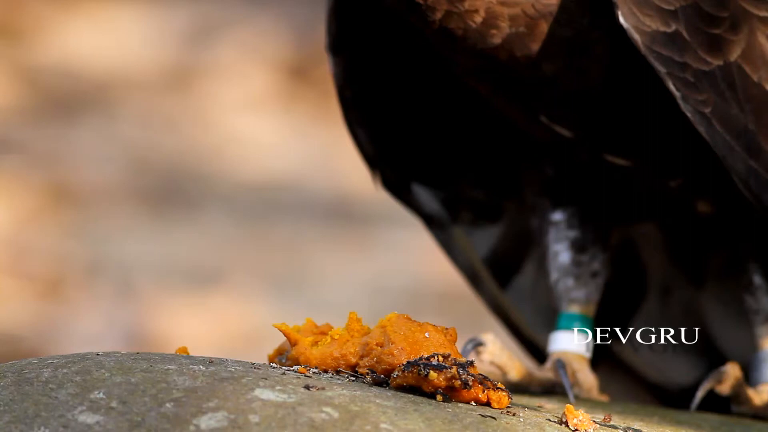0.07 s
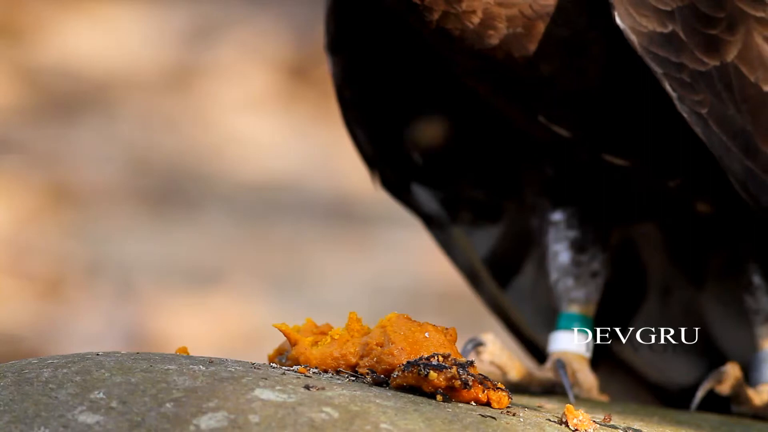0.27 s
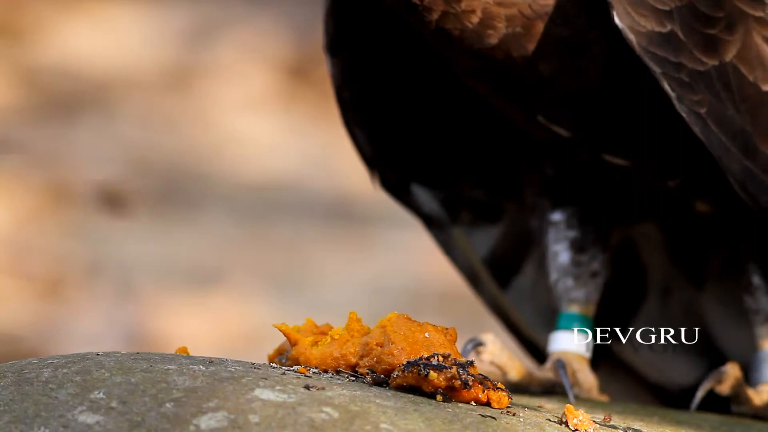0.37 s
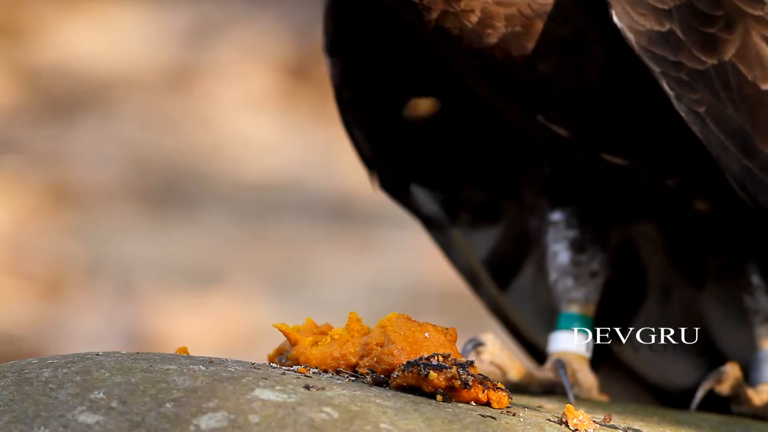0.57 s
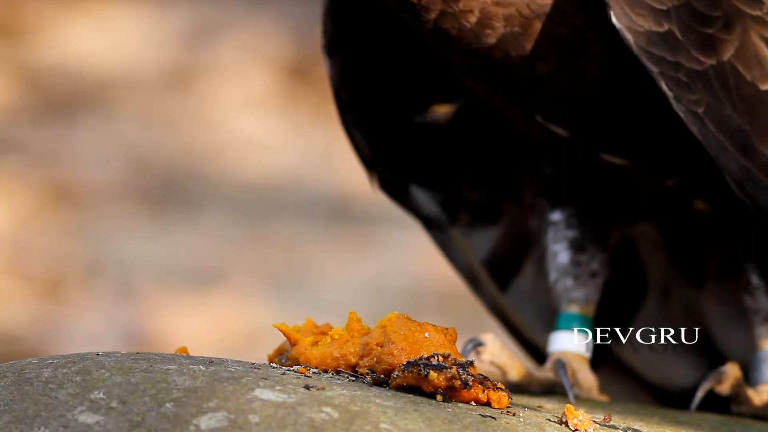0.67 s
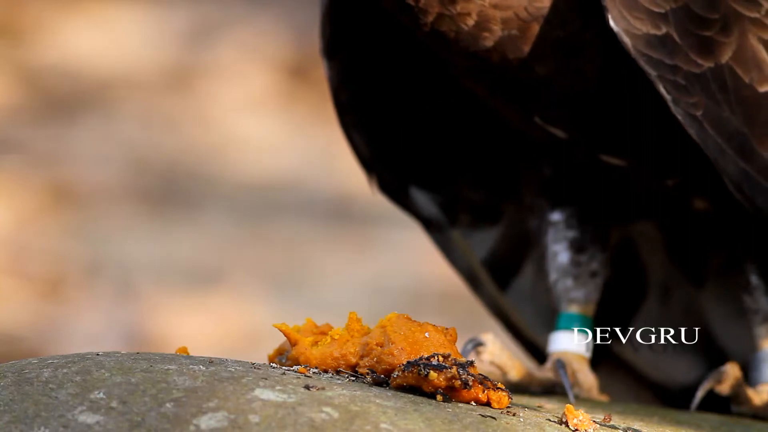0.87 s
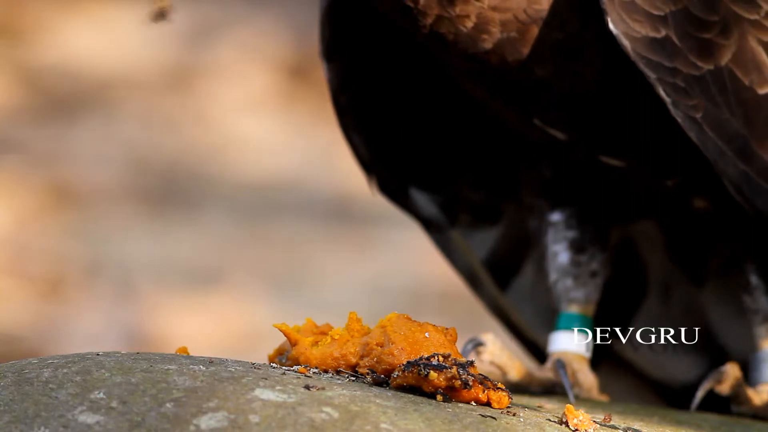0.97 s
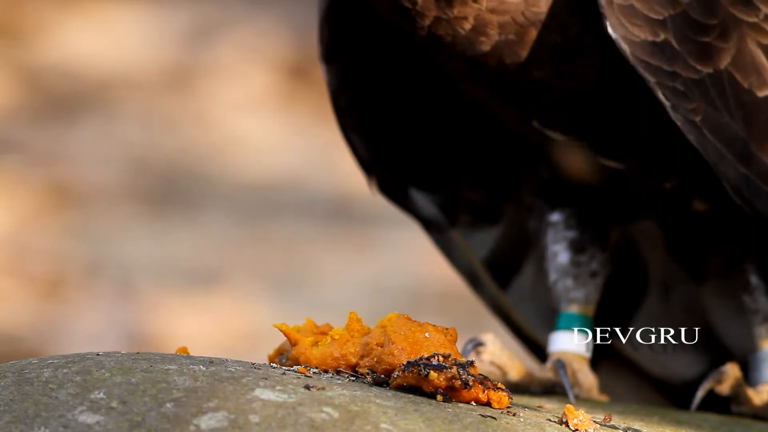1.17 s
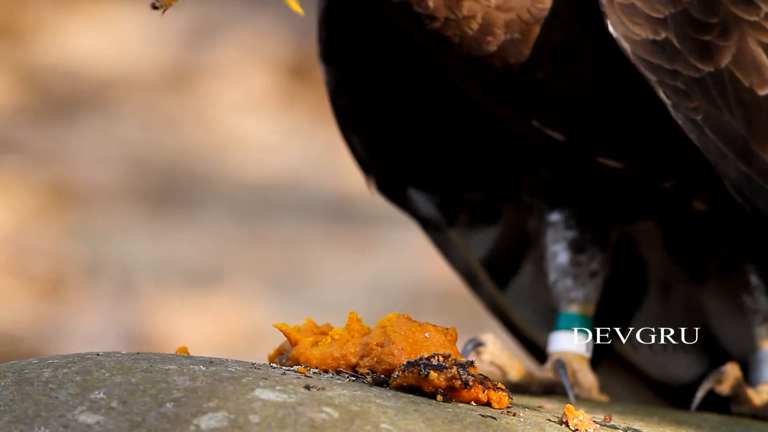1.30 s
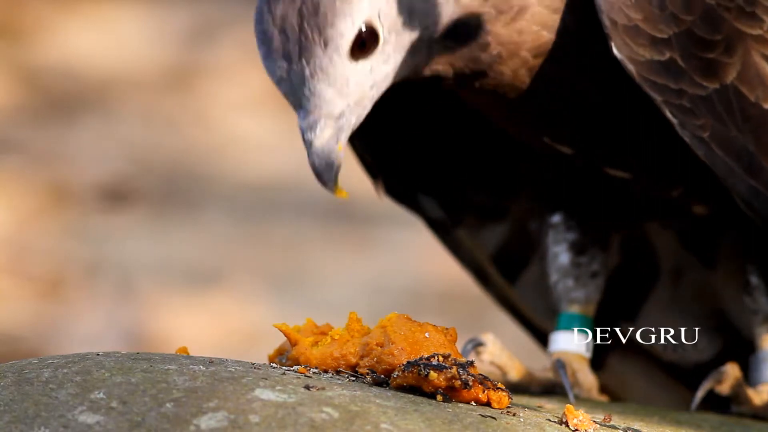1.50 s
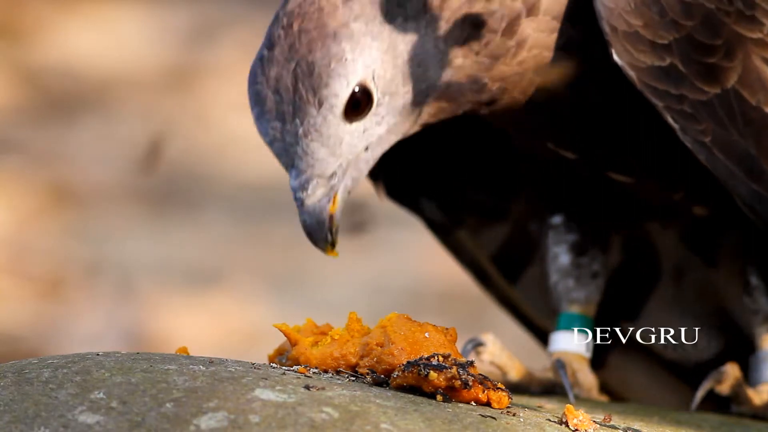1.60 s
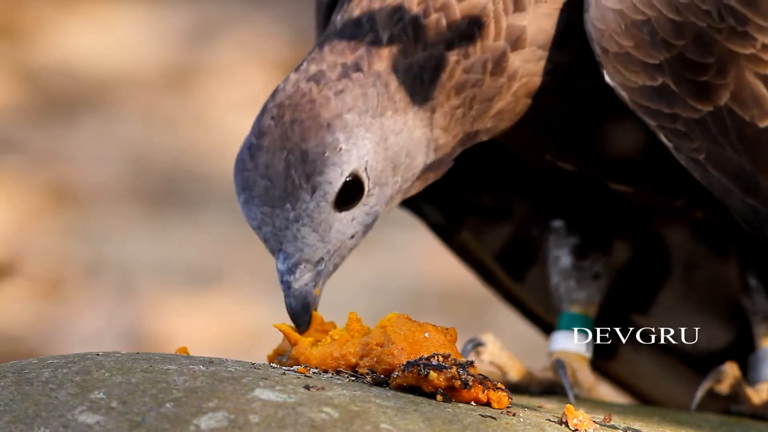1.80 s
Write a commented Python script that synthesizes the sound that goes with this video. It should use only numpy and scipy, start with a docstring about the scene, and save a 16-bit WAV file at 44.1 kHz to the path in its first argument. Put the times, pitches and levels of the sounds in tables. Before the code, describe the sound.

A bird whistles loudly from about 0.4 to 0.55 seconds, dipping, rising and turning hoarse, with three soft, woody taps during it. A farther bird gives short, mostly lower chirps around 0.1 to 0.2 seconds, at 0.7, in a quick cluster near 1.0, at 1.3 and very faintly at 1.5. The calls echo briefly among trees. Faint insect buzzing, distant rumble and steady hiss continue throughout.

```python
"""A bird's loud, scooping whistle turns hoarse among trees; a farther bird adds short, mostly lower chirps.
Each voice is a tone of the syrinx, roughened by phase modulation when its cycles come unevenly.
Reflection from trunks gives echoes, and scattering makes the wood reverberate briefly.
Soft taps, each a set of damped modes with a scuff, fall during the whistle.
Insects buzz faintly over a distant rumble and a steady hiss; the sound is mono."""
import sys
import numpy as np
from scipy import signal
from scipy.fft import rfft, irfft, next_fast_len
from scipy.io import wavfile
from scipy.ndimage import map_coordinates

SR = 44100
rng = np.random.default_rng(int(sys.argv[2]) if len(sys.argv) > 2 else 0)


def transcribe(u):
    """Save the signal u as a 16-bit wav file named by the first command-line argument.

    u: samples, shape (n,) or (channels, n), limited to [-1, 1]; the rate is SR.
    q: integer samples, one column per channel.
    """
    v = np.clip(np.atleast_2d(u).T, -1, 1)
    q = np.round(v * 32767).astype(np.int16)
    wavfile.write(sys.argv[1], SR, q)


N = 81585
T = np.arange(N) / SR


def amp(db):
    """The decibel law: amplitude grows tenfold every 20 dB."""
    return 10 ** (np.asarray(db) / 20)


def wobble(knots_per_s):
    """Spline interpolation of random knots gives a smooth fluctuation."""
    return map_coordinates(rng.standard_normal(4096), [T * knots_per_s], mode="wrap")


def filtered(x, response):
    """Linear filtering: the spectrum is multiplied by a frequency response."""
    size = next_fast_len(N + SR // 2)
    hz = np.fft.rfftfreq(size, 1 / SR)
    return irfft(rfft(x, size) * response(hz), size)[..., :N]


def noise(spectrum):
    """Spectral shaping colours white noise; the result has rms 1."""
    knot_hz, db = np.transpose(spectrum)
    white = rng.standard_normal(N)
    coloured = filtered(white, lambda hz: amp(np.interp(np.log(hz + 1), np.log(knot_hz), db)))
    return coloured / np.sqrt(np.mean(coloured ** 2) + 1e-20)


# spectra of the distant rumble and the hiss: (frequency [Hz], relative spectral density [dB])
RUMBLE_SPECTRUM = [(15, -55), (28, -35), (45, -20), (70, -12.5), (110, -7.5), (170, 0), (235, 0.5),
                   (290, -5.5), (380, -4), (490, 0.5), (620, -8.5), (800, -8.5), (1050, -7), (1500, -10.5),
                   (2500, -17), (5000, -30)]
HISS_SPECTRUM = [(500, 4.5), (2000, 2.5), (3800, 4.5), (5000, 1.5), (6200, -0.5), (9000, -5), (12500, -2),
                 (14500, -10), (15700, -14.5)]
def air(rumble_db=-40.5, sway_db=-0.3, hiss_db=-47):
    """Superposition of broadband noises: a gently swaying rumble under an even hiss."""
    rumble = amp(rumble_db + sway_db * wobble(7.3)) * noise(RUMBLE_SPECTRUM)
    return rumble + amp(hiss_db) * noise(HISS_SPECTRUM)


# spectrum of the insects' buzz: (frequency [Hz], relative spectral density [dB])
INSECT_SPECTRUM = [(5800, -36), (6500, -12.5), (6900, -3.5), (7400, -3), (7800, -10), (8600, -17)]
def insects(level_db=-48.5, flutter_db=0.5):
    """Amplitude modulation makes a thin band of noise flutter."""
    return amp(level_db + flutter_db * wobble(60.46)) * noise(INSECT_SPECTRUM)


# soft taps: (time [s], knock level [dB], scuff level [dB])
TAPS = [(.398, -48, -35), (0.4647, -27.5, -36.5), (.5323, -25, -30.5)]
# modes of a knock: (frequency [Hz], relative level [dB], time to decay by 60 dB [s])
KNOCK_MODES = [(1240, 0.5, 0.017), (786, -22, 0.023), (503, -2.5, 0.038)]
# spectrum of a scuff: (frequency [Hz], relative spectral density [dB])
SCUFF_SPECTRUM = [(200, -23), (500, 5), (1200, -1.5), (1800, -7), (5000, -19.5), (15000, -38)]
def taps(scuff_t60_s=0.11):
    """Damped free vibration: each tap rings as a dull, woody knock, with a short scuff of noise."""
    out = np.zeros(N)
    for start, knock_db, scuff_db in TAPS:
        age = np.maximum(T - start, 0)
        knock = sum(np.sin(2 * np.pi * hz * age) * amp(knock_db + db - 60 * age / t60)
                    for hz, db, t60 in KNOCK_MODES)
        scuff = (age > 0) * noise(SCUFF_SPECTRUM) * amp(scuff_db - 60 * age / scuff_t60_s)
        out += knock + scuff
    return out


def reverberation(x, t60_s, build_s):
    """Scattering forms a diffuse field that builds up, then decays exponentially."""
    build_up = 1 - np.exp(-(T / build_s) ** 2)
    tail = rng.standard_normal(N) * amp(-60 * T / t60_s) * build_up
    return signal.fftconvolve(x, tail / np.linalg.norm(tail))[:N]


# reflections from trunks: (delay [s], gain [dB])
TRUNK_ECHOES = [(.052, -19), (.065, -14), (.106, -22.5), (.13, -29), (.172, -27.5)]
def trunk_echoes(x):
    """Single reflection: each trunk returns a delayed, weaker copy of the sound."""
    return sum(amp(db) * np.interp(T - delay, T, x, left=0) for delay, db in TRUNK_ECHOES)


def syrinx(pitch_hz, rasp_rad):
    """Random phase modulation: a pure tone of rms 1 turns hoarse as its cycles come unevenly."""
    phase = 2 * np.pi * np.cumsum(pitch_hz) / SR
    return np.sqrt(2) * np.sin(phase + rasp_rad * wobble(600))


# the farther bird's notes: (start time [s], duration [s], centre pitch [Hz], glide [Hz/s],
# final droop [Hz], level [dB], hoarseness [0-1])
CHIRPS = [(0.073, 0.071, 2873, -900, 39, -46.5, 0.53), (0.165, .05, 2144, -5000, 270, -34.5, 0.53),
          (0.715, 0.041, 1927, -400, 39, -35, 0.39), (.89, .06, 1380, 799, 14, -48, .1),
          (0.967, .022, 2196, -3000, 60, -33, .2), (.989, .038, 2281, 3005, 39, -38.5, 1.0),
          (1.017, 0.0402, 2092, -8000, 11, -35, 0.35), (1.273, 0.041, 2193, -700, 350, -35.5, 0.3),
          (1.53, 0.066, 3960, -2, 20, -58, .2)]
def chirps(rasp_rad=1.77, roundness=0.6):
    """Frequency modulation: each note glides under a rounded swell and droops as it ends."""
    out = np.zeros(N)
    for start, duration, centre_hz, glide, droop_hz, db, hoarseness in CHIRPS:
        progress = np.clip((T - start) / duration, 0, 1)
        swell = np.abs(np.sin(np.pi * progress)) ** roundness * (progress < 1)
        pitch_hz = centre_hz + glide * duration * (progress - 0.5) - droop_hz * progress ** 6
        out += amp(db) * swell * syrinx(pitch_hz, rasp_rad * hoarseness)
    return out


# course of the loud whistle: (time [s], first voice pitch [Hz], first voice level [dB],
# hoarseness [0-1], second voice relative to the first [dB])
WHISTLE_CONTOUR = [(.399, 2985, -24.5, .1, -32), (0.408, 2912, -23.5, 0.11, -31),
                   (0.422, 2736, -26, 0.11, -32), (.441, 2695, -20, 0.1, -35),
                   (0.457, 2895, -23, 0.14, -23), (0.467, 2763, -25.5, 0.34, -15),
                   (.486, 2928, -29.5, 0.63, -6.5), (.502, 3100, -29, 0.25, 3), (0.519, 3106, -33, .3, -5),
                   (0.529, 3060, -31, 0.45, 1), (0.54, 3080, -33, 0.4, 0)]
def whistle(attack_s=0.0018, release_s=0.0086, rasp_rad=1.06, second_below_hz=375):
    """Biphonation: a clean scoop rises again, hoarse, as the other side of the syrinx joins in lower."""
    times, *columns = np.transpose(WHISTLE_CONTOUR)
    pitch_hz, db, hoarseness, second_db = [np.interp(T, times, column) for column in columns]
    attack = np.clip((T - times[0]) / attack_s + 1, 0, 1)
    release = np.clip((times[-1] - T) / release_s + 1, 0, 1)
    first_voice = syrinx(pitch_hz, rasp_rad * hoarseness)
    second_voice = amp(second_db) * syrinx(pitch_hz - second_below_hz, rasp_rad * hoarseness)
    return amp(db) * attack * release * (first_voice + second_voice)


def scene():
    """Superposition: direct song, its reflections and the background add, alike in both channels."""
    near, far = whistle(), chirps()
    echoes = trunk_echoes(near + amp(-0.5) * far)
    scatter = reverberation(amp(-8.5) * near + amp(-2.5) * far, t60_s=0.22, build_s=0.016)
    wood = reverberation(amp(-14) * near + amp(-12) * far, t60_s=1, build_s=0.021)
    mono = near + far + echoes + scatter + wood + taps() + air() + insects()
    return np.array([mono, mono])


def record(dry, start_s=0.0775, cutoff_hz=15750):
    """Gating and low-pass filtering: the sound starts after a brief silence and is band-limited."""
    gated = dry * (T >= start_s)
    return filtered(gated, lambda hz: np.clip((cutoff_hz - hz) / 300 + 0.5, 0, 1))


dry = scene()
out = record(dry)
transcribe(out)
```